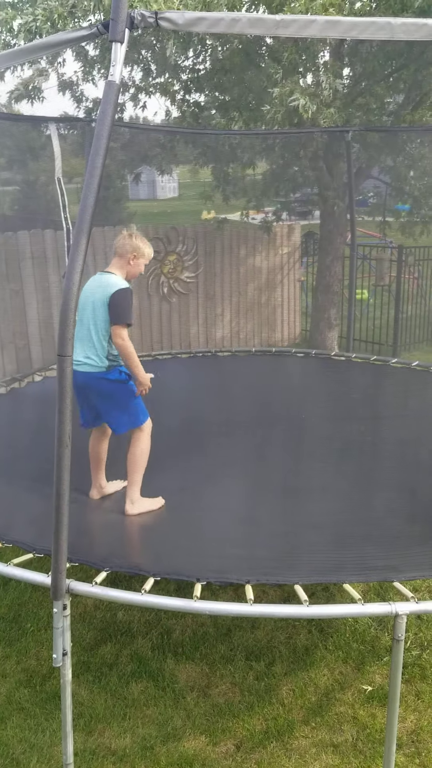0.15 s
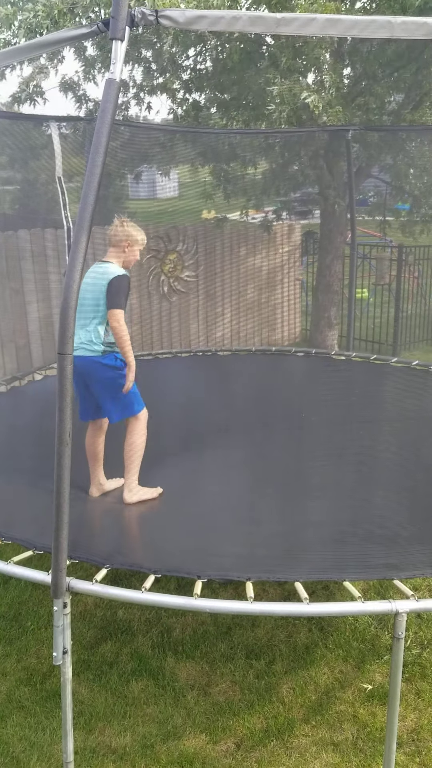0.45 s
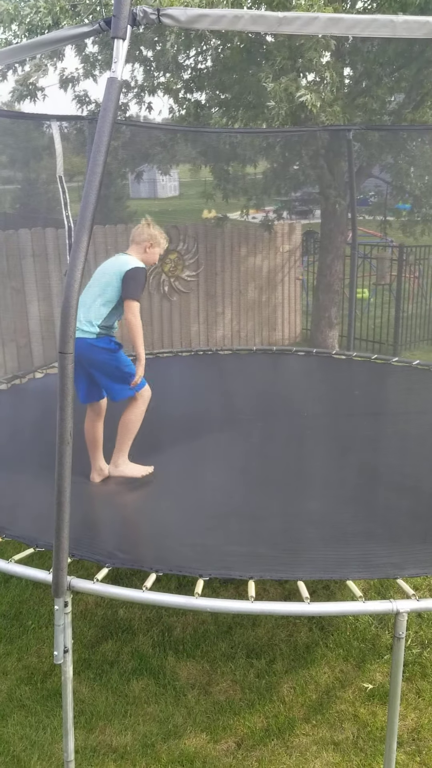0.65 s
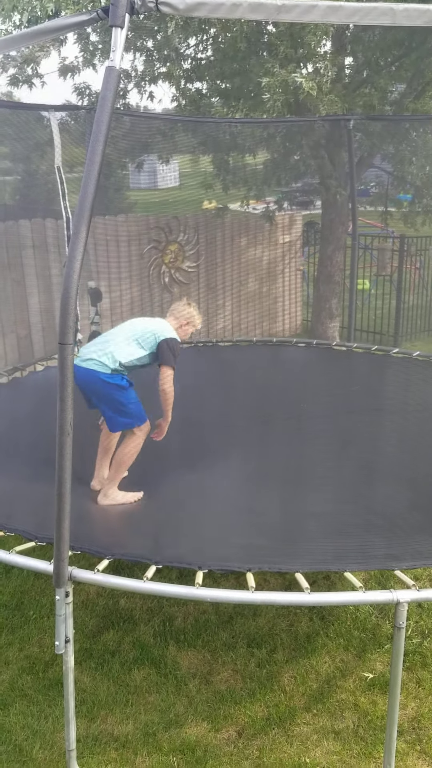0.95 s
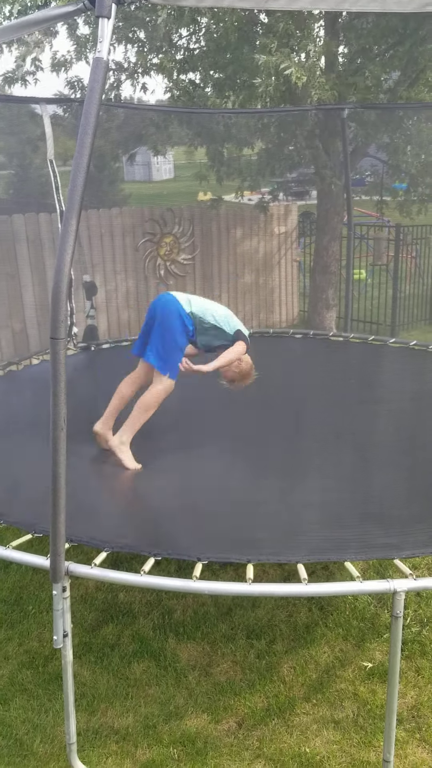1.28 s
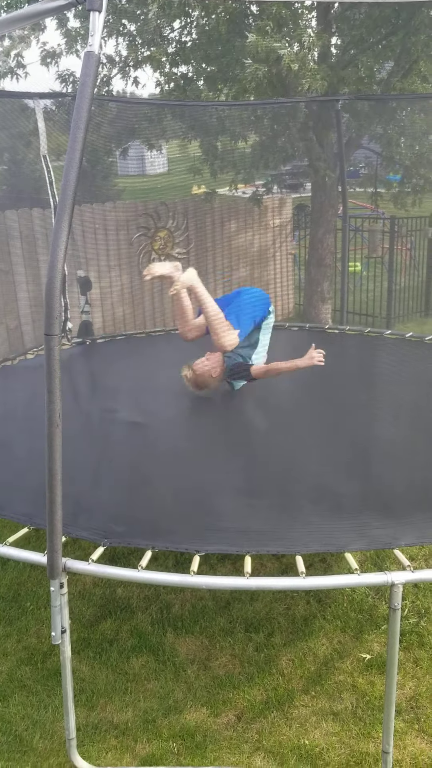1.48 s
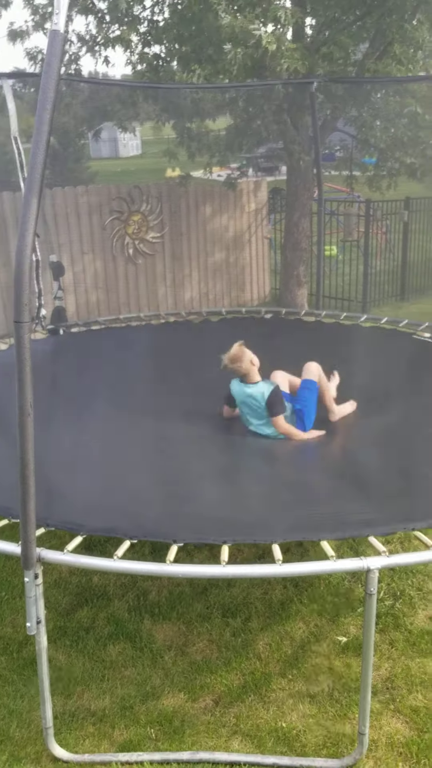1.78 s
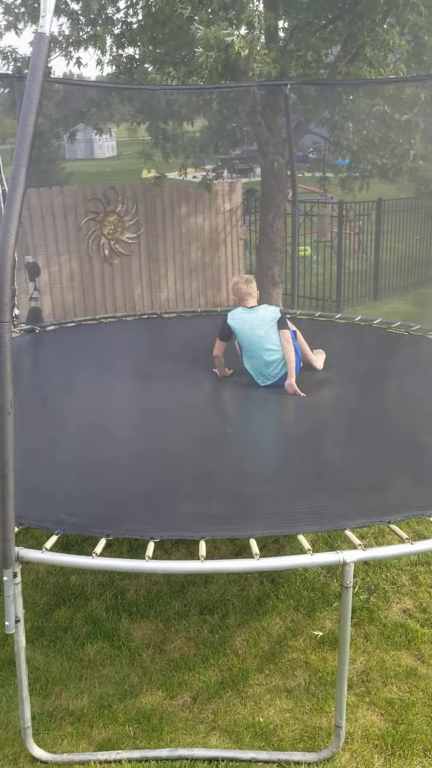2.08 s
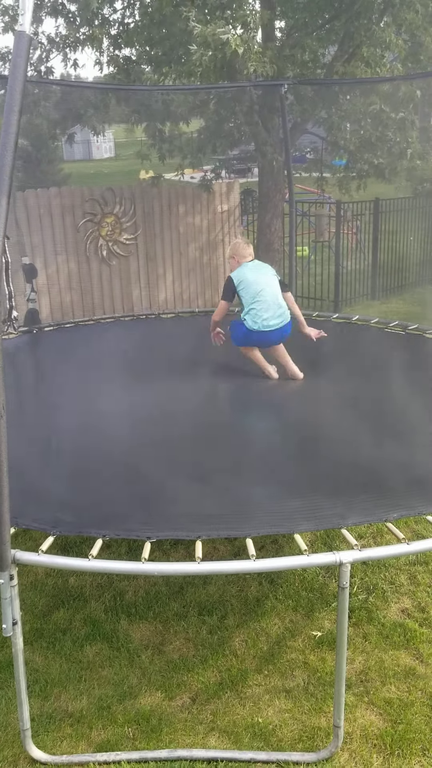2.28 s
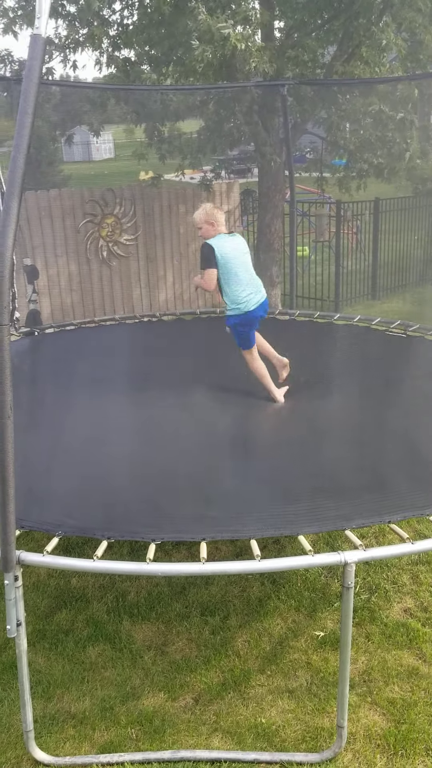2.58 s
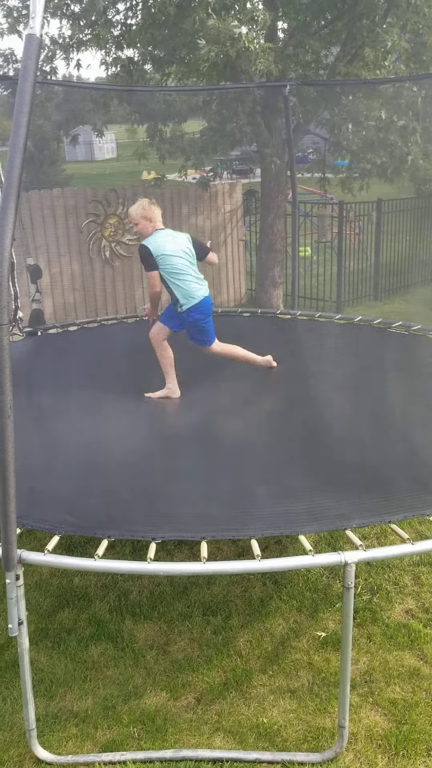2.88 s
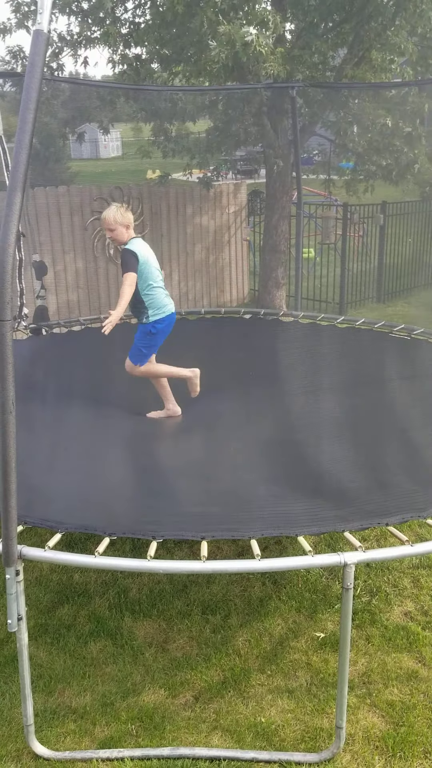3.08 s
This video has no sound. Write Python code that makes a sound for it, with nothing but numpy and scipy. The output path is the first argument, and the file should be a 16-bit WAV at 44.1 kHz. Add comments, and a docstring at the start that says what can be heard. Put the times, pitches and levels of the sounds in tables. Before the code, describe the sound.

Trampoline springs creak and click under light steps, then grow louder as someone tumbles onto the mat with a dull thump and runs across it. A light breeze rumbles on the microphone a few metres away in a quiet backyard.

```python
"""Steel springs creak and a woven mat thumps softly as someone steps, rolls and runs on a trampoline.
The springs grind and their hooks slip on the frame as the mat sinks and comes back up. Feet and clothes
brush the mat; later, single coils sing out, there is one dry snap, and a foot lands with a deep thud.
A light breeze rumbles and buffets the microphone, a few metres away, over the hush of a backyard."""
import sys
import numpy as np
from scipy import signal
from scipy.fft import rfft, irfft
from scipy.io import wavfile

SR = 44100
rng = np.random.default_rng(int(sys.argv[2]) if len(sys.argv) > 2 else 0)


def unload_wav(signal):
    """Save mono or channel-first audio to the path in sys.argv[1] as 16-bit WAV at rate SR, clipped to [-1, 1]."""
    wavfile.write(
        sys.argv[1],
        SR,
        np.round(np.clip(np.atleast_2d(signal).T, -1, 1) * 32767).astype(np.int16),
    )


N = 143325
T = np.arange(N) / SR
HZ = np.fft.rfftfreq(8192, 1 / SR)  # the frequencies at which filter gains are set


def amp(db):
    """Turns decibels into a gain to multiply by."""
    return 10 ** (np.asarray(db) / 20)


def unit(x):
    """Scales x to an average size (rms) of one."""
    return x / np.sqrt(np.mean(x ** 2) + 1e-20)


def spectrum(points):
    """Joins (frequency_hz, level_db) points into a gain for every frequency."""
    hz, db = np.transpose(points)
    return amp(np.interp(np.log(HZ + 1), np.log(hz), db))


def resonant(tone, modes, ring_db):
    """Gains for a broad tone plus modes, the narrow peaks at which an object rings."""
    ring = sum(amp(db + ring_db) ** 2 / (1 + (2 * (HZ - hz) / width) ** 2) for hz, width, db in modes)
    return unit(np.sqrt(spectrum(tone) ** 2 + ring))


def colour(x, gain):
    """Filters x by the given gains, so that it rings after a click, never before."""
    log_gain = np.log(np.maximum(np.r_[gain, gain[-2:0:-1]], 1e-5))
    taps = np.fft.ifft(np.exp(np.conj(signal.hilbert(log_gain)))).real[:len(gain)]
    return signal.fftconvolve(x, taps[None], axes=1)[:, :N]


def widen(x):
    """Turns a middle row and a side row into left and right; low sounds stay near the centre."""
    # stereo width: frequency_hz, side_over_middle_db
    width = [(40, -17), (120, -22), (300, -9.5), (700, -7.5), (1200, -3.5), (2200, -0.5), (6000, -1),
             (14000, 0.5)]
    ratio = spectrum(width)
    middle = colour(x[:1], 1 / np.hypot(1, ratio))
    side = colour(x[1:], ratio / np.hypot(1, ratio))
    return np.vstack([middle + side, middle - side])


def wander(rate_hz):
    """A smooth random wobble; a higher rate makes it quicker."""
    smoothing = np.exp(-(np.fft.rfftfreq(N, 1 / SR) / rate_hz) ** 2)
    return unit(irfft(rfft(rng.standard_normal(N)) * smoothing, N))


def grains(per_s, spread_db):
    """Two rows of tiny, uneven clicks, made as surfaces stick and slip."""
    size = amp(spread_db * np.minimum(rng.exponential(1, (2, N)), 4))
    return unit(size * rng.choice([-1., 1.], (2, N)) * (rng.random((2, N)) < per_s / SR))


def swell(start, rise, hold, fade, db):
    """A level that rises, holds, then drops 20 dB every `fade` seconds."""
    return np.clip((T - start) / rise, 0, 1) * amp(db - 20 * np.maximum(T - start - rise - hold, 0) / fade)


def together(rows):
    """The combined level of several swells."""
    return np.sqrt(sum(swell(*row) ** 2 for row in rows))


def sine(hz):
    """A pure tone (rms one) that follows a changing pitch."""
    return np.sqrt(2) * np.sin(2 * np.pi * np.cumsum(hz) / SR)


def pulse(start, length, hz):
    """A few cycles that grow and die with no ring."""
    return np.sin(np.pi * np.clip((T - start) / length, 0, 1)) * np.sin(2 * np.pi * hz * (T - start))


def scatter(x, decay_s):
    """Random echoes, different in each row, that drop 60 dB in decay_s."""
    t = T[:SR // 3]
    echoes = rng.standard_normal((2, len(t))) * (rng.random((2, len(t))) < 2000 / SR)
    echoes *= amp(-60 * t / decay_s)
    return signal.oaconvolve(x, echoes / np.linalg.norm(echoes, axis=1, keepdims=True), axes=1)[:, :N]


def coils(x, count=4, cycle_s=0.525, ring_db=-2.5):
    """Coils take the weight in turn, each with its own short ring, so the tone keeps changing."""
    shares = [np.maximum(np.cos(2 * np.pi * (T / cycle_s + k / count)), 0) for k in range(count)]
    ring = sum(scatter(x * share, decay_s=0.044) for share in shares)
    return (x + amp(ring_db) * ring) / np.hypot(1, amp(ring_db))


def hook_clicks(slips, is_treble, boost_db=13.5):
    """One sharp click as each hook breaks free; the side row comes 0.5 ms late."""
    clicks = np.zeros(N)
    for start, db, treble_db in slips:
        clicks[round(start * SR)] = amp(db + is_treble * treble_db + boost_db)
    return np.array([clicks, np.roll(clicks, SR // 2000)])


def springs(creaks, slips, gain, treble_hz=3510):
    """Jerky grinding and slipping hooks make the coils and the frame ring."""
    stages = [(0.022, 0), (.065, -13)]  # a slip's short burst and its softer rattle: fade_s, offset_db
    rattles = [(start, 0.0006, .004, fade, db + offset_db, treble_db)
               for start, db, treble_db in slips for fade, offset_db in stages]
    judder = unit(amp(2 * wander(rate_hz=70)))
    highs = 1 / (1 + (treble_hz / (HZ + 1)) ** 8)
    friction = 0
    for band, is_treble in (1 - highs, False), (highs, True):
        creak = together([(*shape, db + is_treble * treble_db) for *shape, db, treble_db in creaks])
        rattle = together([(*shape, db + is_treble * treble_db) for *shape, db, treble_db in rattles])
        grinding = grains(per_s=4500, spread_db=2.5) * np.hypot(creak * judder, rattle)
        friction += colour(grinding + hook_clicks(slips, is_treble), np.sqrt(band))
    return widen(coils(colour(friction, gain)))


def stretching_springs():
    """The springs creak as the weight pulls them longer."""
    # spells of grinding: start_s, rise_s, hold_s, fade_s, level_db, treble_db
    creaks = [(0.0, 0.0094, 0.013, 0.086, -46.5, -7), (.225, 0.0047, 0.079, 0.063, -51, -1),
              (.346, 0.0058, 0.17, 0.061, -52.5, 8.5), (1.01, 0.017, 0.14, 0.12, -46.5, 0),
              (1.24, 0.013, 0.042, 0.046, -43.5, -1.5), (1.32, 0.016, 0.028, 0.07, -48, 3),
              (1.41, 0.0039, 0.032, 0.42, -53, 0.5), (1.555, 0.017, 0.22, .1, -56, -6),
              (1.748, 0.021, 0.023, 0.075, -40.5, 7), (1.787, 0.011, 0.049, 0.12, -37.5, -0.5),
              (1.865, .01, 0.035, 0.049, -39, -9), (2.272, 0.019, 0.02, 0.048, -47, 1.5),
              (2.345, 0.015, 0.054, .06, -51, 5.5), (2.4, 0.041, 0.035, 0.076, -36, -2.5),
              (2.565, 0.012, 0.022, 0.042, -47, -3), (2.66, 0.0059, 0.1, .1, -53, -1),
              (2.77, 0.029, 0.074, 0.2, -49, 2.5)]
    # hooks slipping on the frame: start_s, level_db, treble_db
    slips = [(.372, -39, 3), (0.404, -41, 0), (.424, -41, 2.5), (0.454, -40, 2.5), (.48, -40, 2),
             (0.499, -45.5, 0), (0.936, -43.5, 6), (.947, -44, 4), (1.033, -45, 6), (1.079, -46.5, 3),
             (1.106, -40.5, -9), (1.135, -46, -1), (1.187, -45, 6), (1.224, -45, 8), (1.246, -43, 9),
             (1.286, -43, -3), (1.736, -44.5, -3), (1.8, -34, -9), (1.81, -35, 1), (1.837, -36.5, -6),
             (1.899, -35.5, -12), (2.189, -48, -9), (2.354, -47, -11), (2.408, -40.5, -5),
             (2.495, -33.5, -3.5), (2.633, -42, 1), (2.884, -45, -12)]
    # broad tone of the metal: frequency_hz, level_db
    tone = [(100, -38), (350, -1), (600, -14), (720, -7.5), (1000, -2), (1230, -5.5), (1550, 2),
            (1950, 0.5), (3100, -2), (5400, -3.5), (7000, -14.5), (11000, -17), (16000, -29)]
    # where springs and frame ring: pitch_hz, width_hz, level_db
    modes = [(938, 145, -1), (1010, 70, -11.5), (1403, 97, 1), (1643, 88, -2.5), (2180, 190, -3),
             (2966, 320, -0.5), (4870, 34, -9.5), (5300, 340, -8)]
    return springs(creaks, slips, resonant(tone, modes, ring_db=6.5))


def mat_thumps():
    """The slack mat gives a dull thump as it takes the weight."""
    # thumps: start_s, rise_s, hold_s, fade_s, level_db
    thumps = [(0.0, 0.0038, .05, 0.22, -56), (.9, 0.021, 0.038, 0.17, -59.5),
              (1.08, 0.015, 0.02, 0.056, -57), (1.794, 0.0051, 0.043, 0.07, -40.5),
              (1.86, 0.016, 0.051, 0.066, -47), (2.44, 0.0033, 0.015, 0.06, -41),
              (2.52, 0.022, 0.064, 0.083, -50.5), (2.96, 0.062, 0.21, 0.088, -59.5)]
    # broad tone of the mat: frequency_hz, level_db
    tone = [(30, -6.5), (70, -2), (130, -2), (270, -5.5), (420, -8), (550, -18), (900, -10.5), (2500, -69)]
    modes = [(245, 34, 0), (379, 16, 0)]  # pitch_hz, width_hz, level_db
    push = rng.standard_normal((2, N)) * together(thumps)
    return widen(colour(push, resonant(tone, modes, ring_db=-1)))


def mat_slackening(octaves_per_s=5, waver_hz=14.7):
    """A foot lifts and the mat loosens, so its brief hollow ring falls in pitch."""
    # shape of the ring: start_s, rise_s, hold_s, fade_s
    shape = (0.0, .012, .06, .09)
    modes = [(345, -56), (630, -61)]  # first_pitch_hz, level_db
    sag = 2 ** (-octaves_per_s * np.maximum(T - shape[0], 0))
    waver = waver_hz * wander(rate_hz=57.4)
    return sum(swell(*shape, db) * sine(hz * sag + waver) for hz, db in modes)


def breeze(level_db=-54.5, gust_db=-3):
    """Air buffets the microphone: a lumpy rumble, different on each side."""
    # stronger puffs: start_s, rise_s, hold_s, fade_s, level_db, lean_left_db
    puffs = [(0.872, 0.015, 0.088, 0.16, -44.5, 0.5), (2.052, 0.0098, 0.017, .05, -44, 0.5),
             (2.441, 0.01, 0.12, 0.046, -39.5, 3), (2.71, 0.065, 0.15, 0.17, -53, -7),
             (3.124, 0.01, .09, .1, -55, -13)]
    # tone of the rumble: frequency_hz, level_db
    tone = [(20, -26.5), (50, 1), (80, 1.5), (130, -6), (220, -16.5), (450, -40), (2000, -92)]
    puff_level = [together([(*shape, db + side * lean) for *shape, db, lean in puffs]) for side in (1, -1)]
    level = np.hypot(amp(level_db + gust_db * wander(rate_hz=27)), puff_level)
    return level * colour(rng.standard_normal((2, N)), unit(spectrum(tone)))


def yard_hush(level_db=-53.5, drift_db=.5):
    """A soft, nearly steady outdoor hush."""
    # tone of the hush: frequency_hz, level_db
    tone = [(12, -45), (20, -13), (74, -5.5), (240, -6.5), (345, -7), (496, -15.5), (843, -15), (1280, -19),
            (2720, -17), (5950, -17), (15800, -22.5)]
    level = amp(level_db + drift_db * wander(rate_hz=2))
    return level * widen(colour(rng.standard_normal((2, N)), unit(spectrum(tone))))


def mat_brushing():
    """The weave hisses under sliding feet and clothes, which catch and let go."""
    # rubs on the mat: start_s, rise_s, hold_s, fade_s, level_db
    rubs = [(.23, 0.014, 0.012, 0.065, -44.5), (.575, 0.026, 0.066, 0.086, -48.5),
            (1.0, 0.0075, 0.016, 0.042, -48), (1.24, 0.017, 0.1, 0.045, -52),
            (1.67, 0.032, 0.035, 0.082, -53), (1.785, 0.01, 0.054, 0.11, -42),
            (1.88, 0.042, 0.042, .05, -47), (1.955, 0.026, 0.13, 0.047, -43),
            (2.395, 0.032, 0.047, 0.076, -41.5), (3.215, 0.0019, 0.0077, 0.045, -42.5)]
    # broad tone of the weave: frequency_hz, level_db
    tone = [(200, -22), (900, -6), (2200, 0), (5200, -1), (7100, -2.5), (9500, 2), (12000, 1.5),
            (16000, -4.5)]
    # where the weave rings: pitch_hz, width_hz, level_db
    modes = [(2140, 100, 1), (3970, 57, 0.78), (6290, 150, -0.23), (7970, 420, -1.4)]
    catching = unit(amp(2.5 * wander(rate_hz=44.6)))
    friction = grains(per_s=9000, spread_db=-0.5) * together(rubs) * catching
    return widen(colour(friction, resonant(tone, modes, ring_db=9.5)))


def recoiling_springs():
    """The springs creak again as the weight lifts and they pull back."""
    # spells of grinding: start_s, rise_s, hold_s, fade_s, level_db, treble_db
    creaks = [(.56, 0.013, 0.11, 0.068, -51.5, 1.5), (1.953, 0.035, 0.012, 0.096, -37.5, 6.5),
              (2.005, 0.012, 0.046, 0.16, -38.5, 0.5), (2.17, 0.011, 0.03, 0.13, -50.5, -19),
              (2.952, 0.0092, 0.017, 0.1, -37, 0.5), (3.05, 0.017, .03, 0.12, -43, -4),
              (3.214, 0.0026, .025, 0.11, -50, 4.5)]
    # hooks slipping on the frame: start_s, level_db, treble_db
    slips = [(2.05, -39, 0.5), (2.9543, -35.5, -1.5), (2.984, -35, 1), (3.046, -31.5, -0.5),
             (3.068, -38, 2.5), (3.109, -31, 3)]
    # broad tone of the metal: frequency_hz, level_db
    tone = [(100, -60), (350, 1.5), (600, -11), (850, 3), (1200, -3), (1600, 0.5), (1950, 2), (3100, 3.5),
            (5600, -1.5), (7000, -8), (11000, -10), (16000, -16)]
    # where springs and frame ring: pitch_hz, width_hz, level_db
    modes = [(828, 10.6, 0), (1430, 94, -1.5), (1560, 53, -0.5), (2430, 45, 3.5), (2920, 90, 3),
             (3373, 31, 4), (4160, 63, -2), (5230, 16, 6.5), (5460, 93, -2), (5710, 8.6, -1),
             (9700, 30, -28)]
    return springs(creaks, slips, resonant(tone, modes, ring_db=6))


def coil_pings(waver_hz=14.7):
    """Single coils ring briefly above the grinding, each on one slightly wavering note."""
    # ringing coils: start_s, rise_s, hold_s, fade_s, level_db, pitch_hz
    pings = [(1.796, .006, 0.037, 0.045, -45, 1408), (1.8, 0.0055, .04, .07, -49.5, 1058),
             (1.977, 0.012, 0.013, 0.063, -43.5, 4640), (2.006, 0.0067, 0.011, 0.026, -42.5, 1642),
             (2.01, .01, .015, 0.12, -54.5, 830), (2.164, 0.0024, .012, 0.03, -54, 13950),
             (2.492, .004, .006, 0.014, -43, 1080), (2.96, 0.014, 0.01, 0.1, -45.5, 1615),
             (2.962, 0.013, .012, 0.14, -49, 819), (3.05, 0.0051, 0.035, 0.042, -50.5, 1512),
             (3.112, .002, 0.0092, 0.049, -49, 5380), (3.113, .002, .008, 0.061, -50, 10300)]
    waver = waver_hz * wander(rate_hz=57.4)
    return sum(swell(*shape) * sine(hz + waver) for *shape, hz in pings)


def snap(left_db=-21.5, right_db=-12.5):
    """One dry click to the right, about three cycles long."""
    return amp([[left_db], [right_db]]) * pulse(start=2.0427, length=0.0013, hz=2660)


def deep_thuds():
    """A foot lands with one deep thud, then a low buffet of air hits the left microphone."""
    # the thud and the buffet: start_s, length_s, pitch_hz, left_db, right_db
    thuds = [(2.44, 0.016, 99, -27.5, -24.5), (2.513, 0.043, 80, -28, -40)]
    return sum(amp([[left], [right]]) * pulse(start, length, hz) for start, length, hz, left, right in thuds)


def scene():
    """The trampoline in its yard; fence and trees faintly echo the creaks and rubs."""
    rubbing = stretching_springs() + recoiling_springs() + mat_brushing()
    echo = amp(-10.5) * scatter(rubbing, decay_s=0.36)
    return (rubbing + echo + coil_pings() + mat_thumps() + deep_thuds() + snap()
            + breeze() + yard_hush() + mat_slackening())


def record(dry, tilt_db=0.47, cutoff_hz=16000):
    """The microphone is a little brighter on the left and cuts off the highest treble."""
    tilt = amp(tilt_db * np.clip(HZ / 4000 - 1, -1, 1))
    stereo = np.vstack([colour(dry[:1], tilt), colour(dry[1:], 1 / tilt)])
    lowpass = signal.firwin(511, cutoff_hz, window=("kaiser", 9), fs=SR)
    return signal.oaconvolve(stereo, lowpass[None], "same")


dry = scene()
out = record(dry)
unload_wav(out)
```